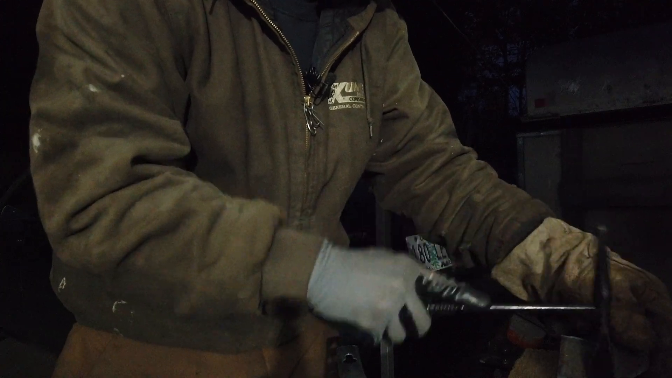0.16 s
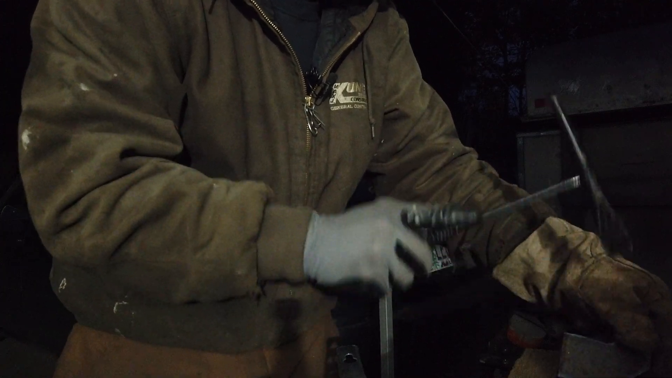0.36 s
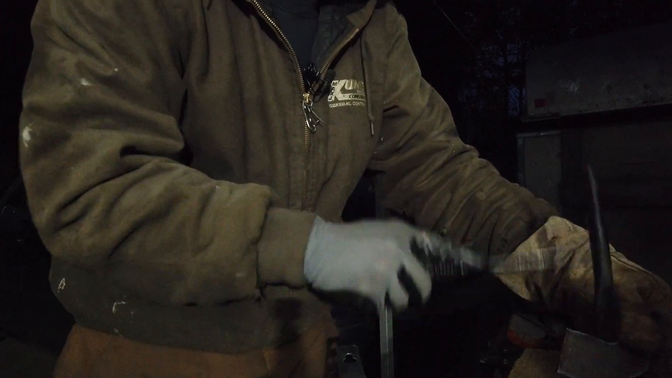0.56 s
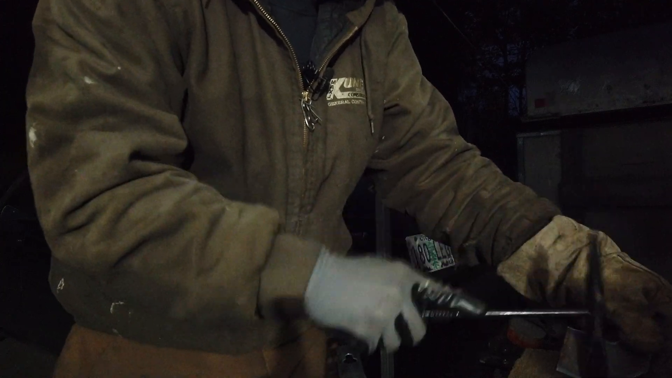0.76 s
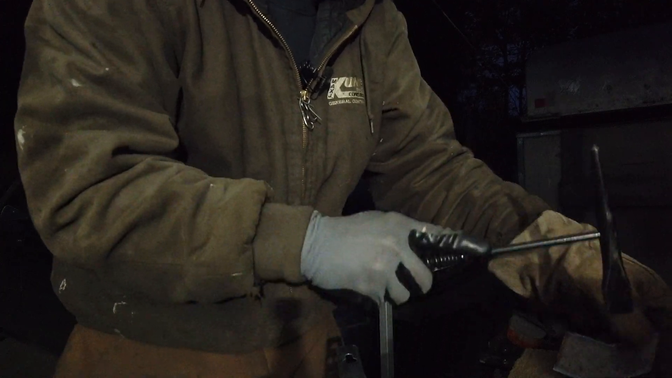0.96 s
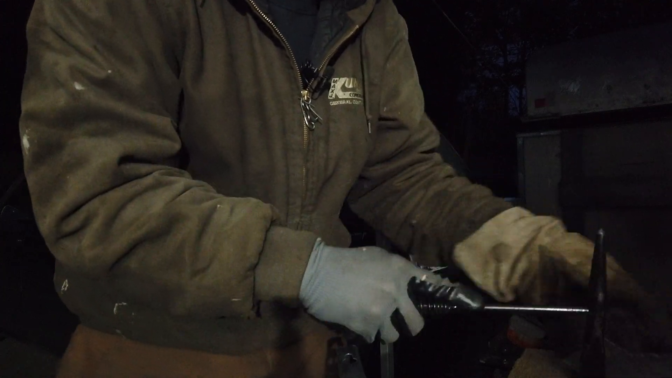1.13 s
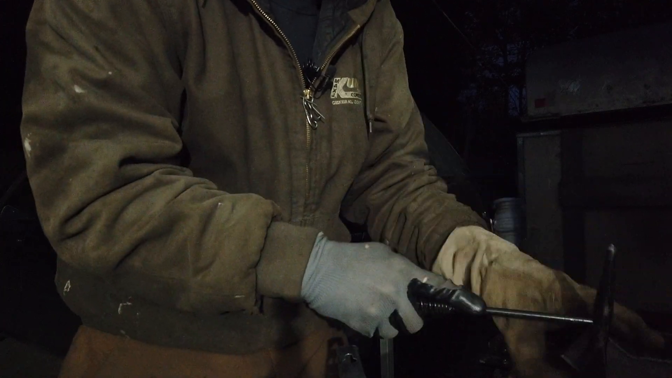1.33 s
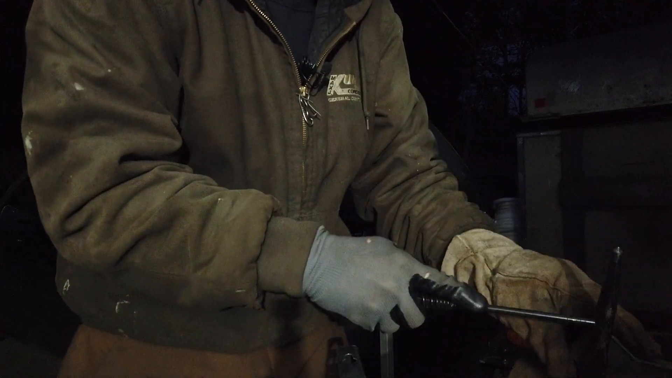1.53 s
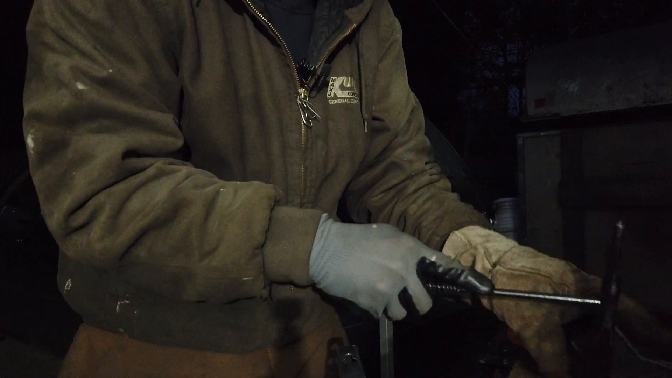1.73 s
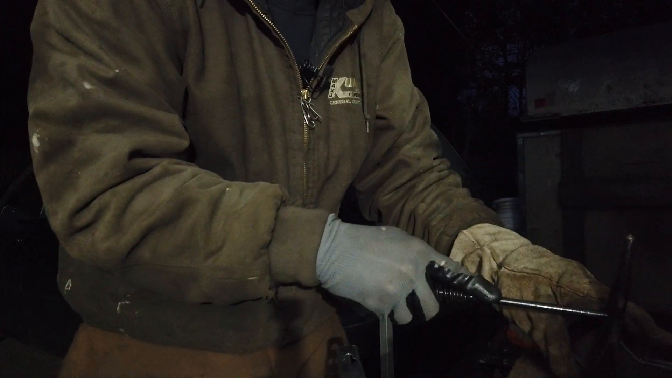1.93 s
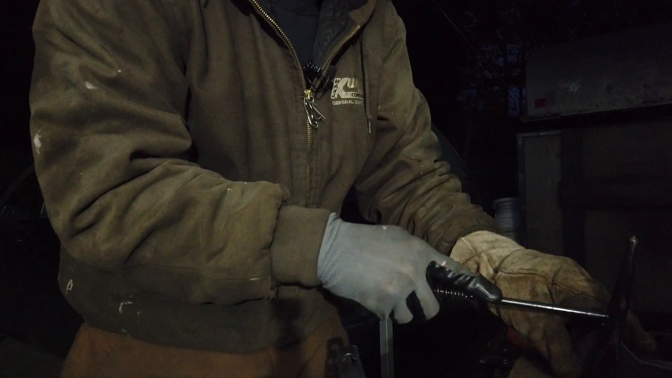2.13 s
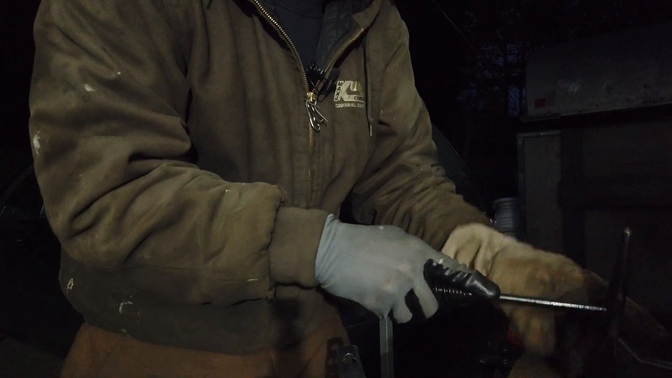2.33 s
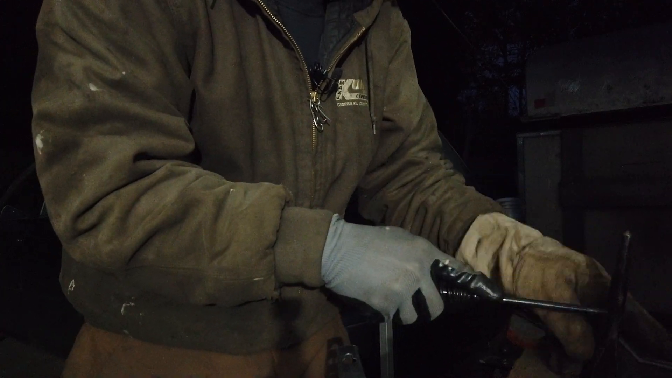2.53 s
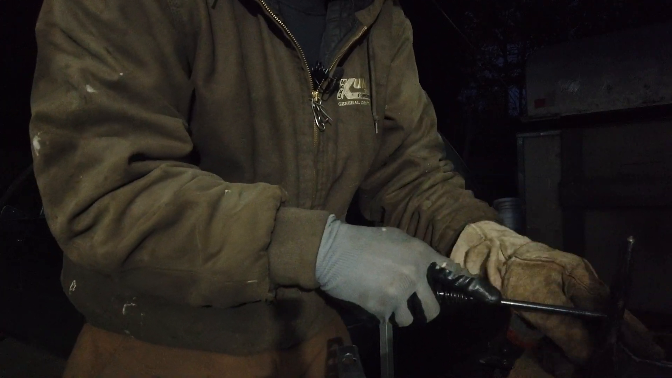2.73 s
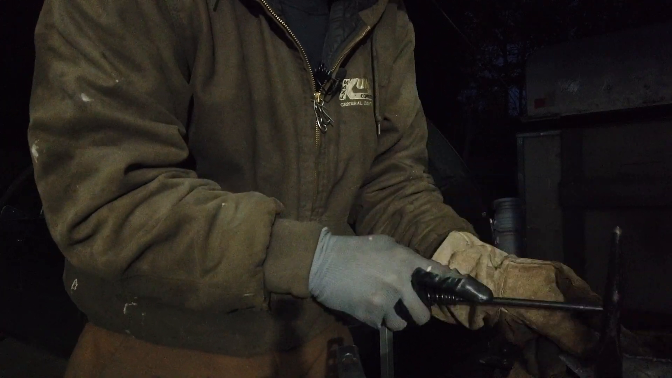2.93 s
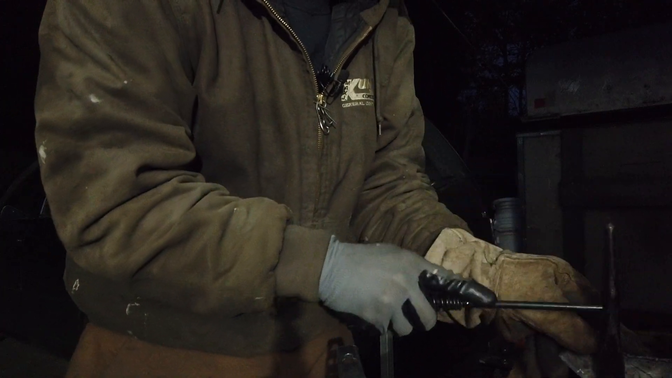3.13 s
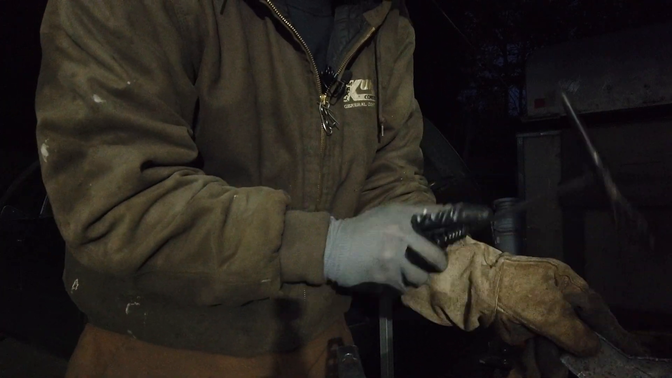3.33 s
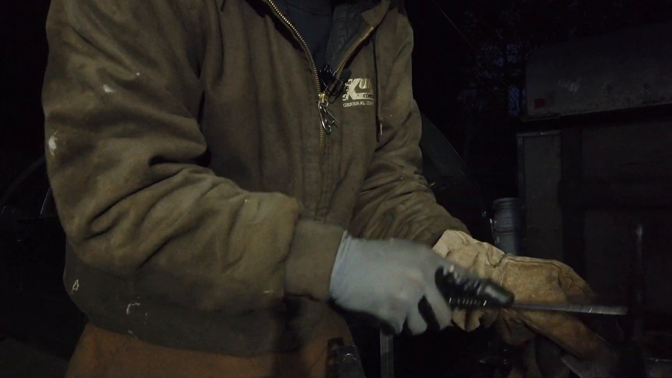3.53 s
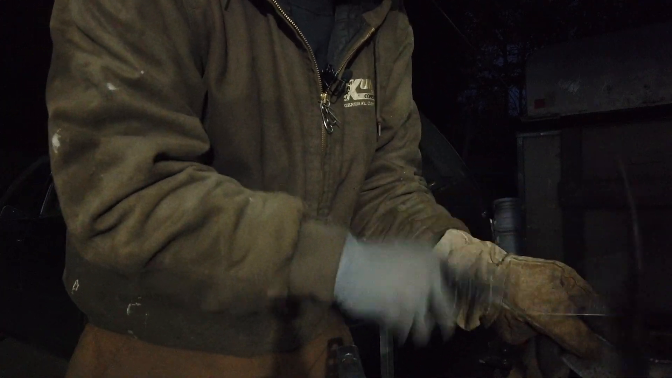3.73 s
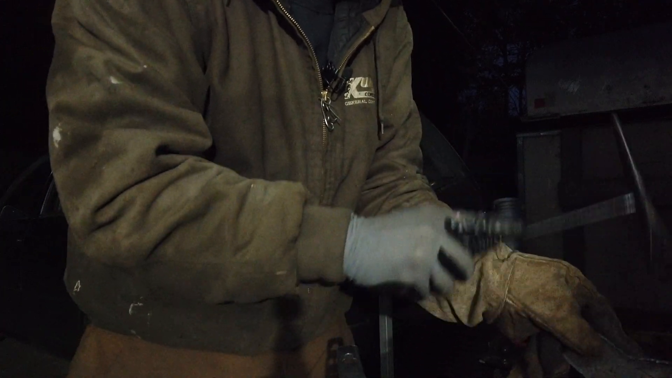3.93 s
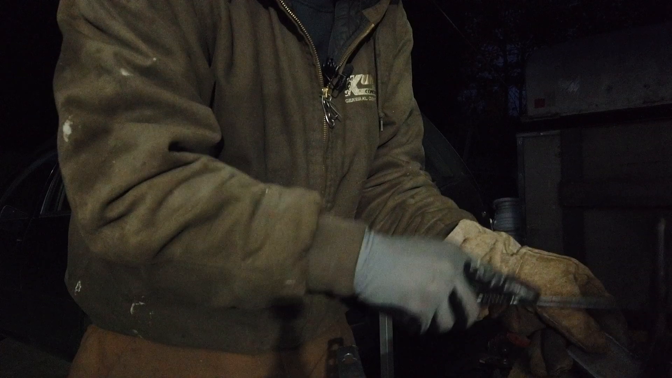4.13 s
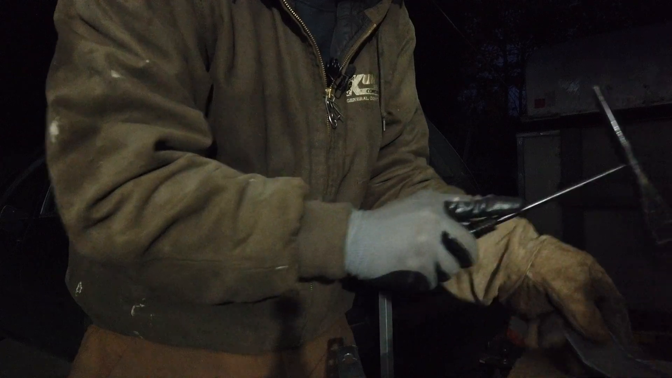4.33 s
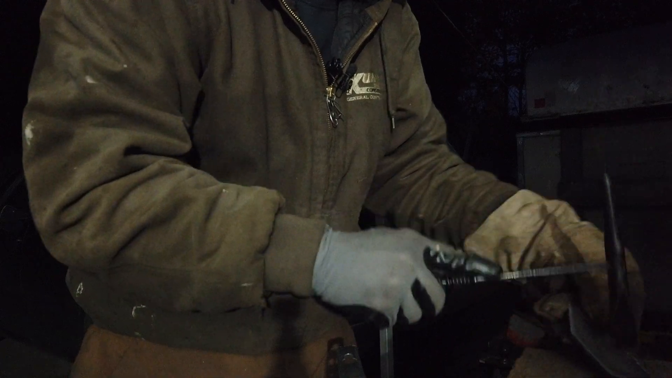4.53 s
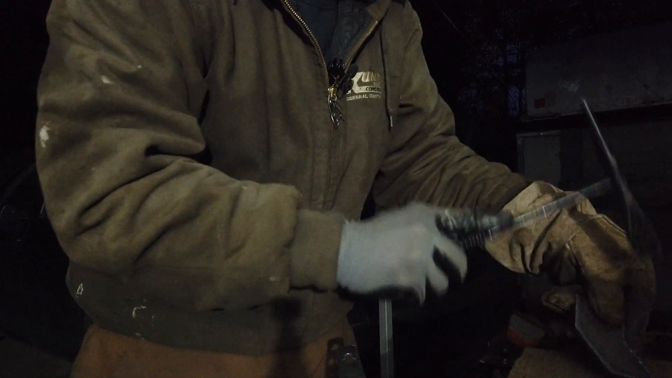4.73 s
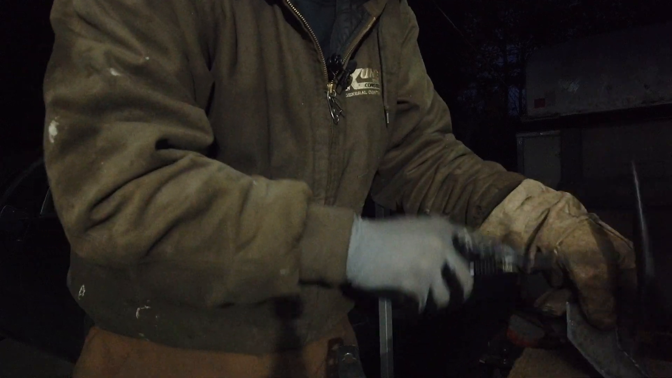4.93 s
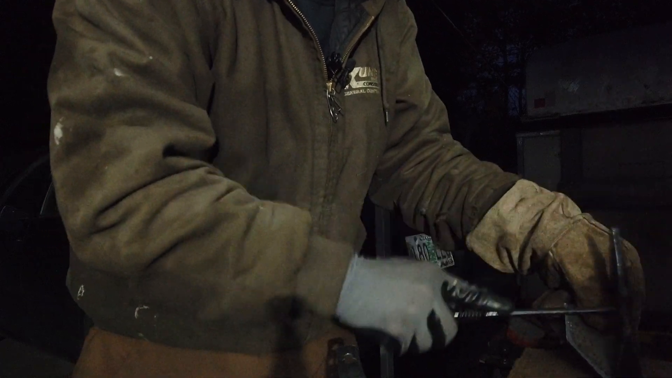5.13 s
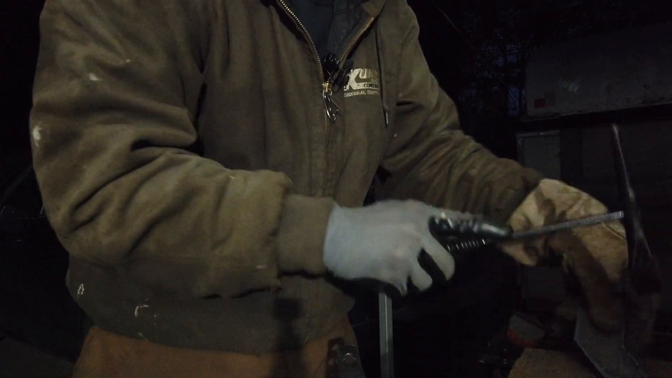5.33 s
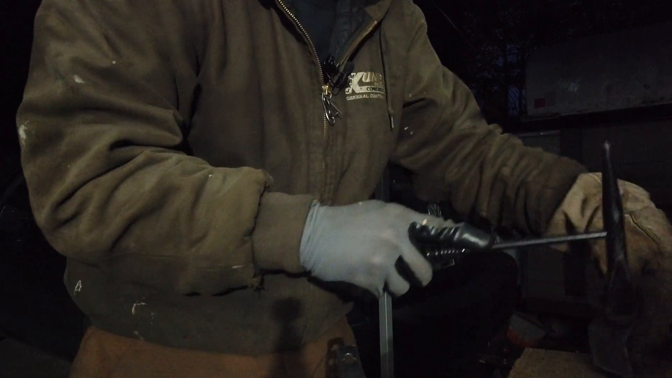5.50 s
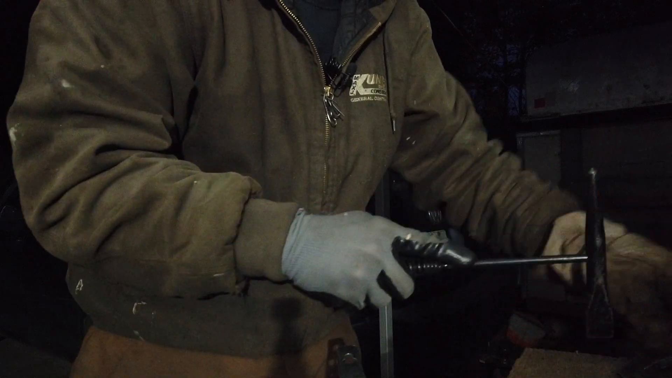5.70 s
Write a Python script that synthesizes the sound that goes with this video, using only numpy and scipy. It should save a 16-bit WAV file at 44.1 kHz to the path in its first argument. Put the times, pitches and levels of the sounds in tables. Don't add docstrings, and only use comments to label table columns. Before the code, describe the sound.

Close sound of a pointed steel hammer chipping a loose cut plate in a small workshop. Hard, gritty clanks with a short plate thump fall at 0.28, 0.58 and 0.88 seconds, then a lighter, thinner chip at 1.26 rings a little longer. From about 1.3 to 3.2 the work quiets: glove scuffs, sleeve rustle, dull ticks, and a clear little bouncing ping near 2.0, with smaller taps after. Gas hiss, low rumble and a faint far engine hum become more noticeable. A light chip at 3.23 leads to a bright ringing crack at 3.59, the hardest clank at 3.90 and a heavy, rattling blow at 4.20. The plate is shifted with rustling and scuffing around 4.4, then duller strong blows land at 4.95 and 5.25. Small scuffs and ticks close from 5.7. Echo is short; the loudest hits overload the microphone; treble noise spreads slightly in stereo.

```python
import sys
import numpy as np
from scipy import signal
from scipy.fft import rfft, irfft, next_fast_len
from scipy.io import wavfile
from scipy.ndimage import uniform_filter1d, minimum_filter1d, map_coordinates

SR = 44100
rng = np.random.default_rng(int(sys.argv[2]) if len(sys.argv) > 2 else 0)


def wrap_up_sound(samples):
    columns = np.atleast_2d(samples).T
    tamed = np.clip(columns, -1, 1)
    steps = np.round(tamed * 32767).astype(np.int16)
    wavfile.write(sys.argv[1], SR, steps)


def invert_db(level):
    return 10 ** (np.asarray(level, dtype=float) / 20)


N = 258426
T = np.arange(SR // 4) / SR

# (first touch t/s, crack level/dB, brightness/dB, push on the plate level/dB,
# wait until the plate slaps the bench t/s)
BLOWS = [
    (0.2767, -8, -11, -29, 0.002),
    (.5816, -4, -16.5, -27, 0.0025),
    (0.8795, -9, -12, -20.5, 0.0011),
    (1.2596, -17.5, -12.5, -56, 0.0037),
    (3.2286, -14.5, -18, -55, 0.00066),
    (3.5921, -3.5, -4, -25.5, 0.0066),
    (3.902, -1, -10.5, -20, .002),
    (4.1974, -2, -19, -16.5, 0.0019),
    (4.9478, -2, -21.5, -21, 0.0042),
    (5.2469, -4.5, -17, -16.5, 0.0018),
]
# (t/s, hiss level/dB)
QUIET = [(0, -61.5), (1.2, -62), (1.94, -60.5), (3.1, -57.5), (3.4, -54.5), (3.58, -57), (3.65, -55.5),
         (3.89, -64.5), (3.96, -64), (4.5, -63.5), (5.2, -64.5), (5.7, -63.5), (5.86, -61.5)]


def unit(x):
    return x / np.sqrt(np.mean(x ** 2) + 1e-20)


def along(points, hz):
    f, v = np.transpose(points)
    return np.interp(np.log(hz + 1), np.log(f + 1), v)


def curve(rows, outside=None):
    s, values = np.transpose(rows)
    return np.interp(np.arange(N) / SR, s, values, outside, outside)


def wobble(rate):
    s = np.arange(0, N + 64, 64)
    knots = rng.standard_normal(int(N * rate / SR) + 4)
    return np.interp(np.arange(N), s, map_coordinates(knots, [s * rate / SR]))


def held_db(start, stop, db, slope_db_per_s):
    s = np.arange(N) / SR
    outside_s = np.maximum(np.maximum(start - s, s - stop), 0)
    return db - slope_db_per_s * outside_s


def tone(hz):
    return np.sin(2 * np.pi * np.cumsum(hz) / SR)


def fade(t, t60, attack):
    return invert_db(-60 * t / t60) * (1 - np.exp(-t / attack))


def filtered(x, response):
    m = next_fast_len(len(x) + 8192)
    return irfft(rfft(x, m) * response(np.fft.rfftfreq(m, 1 / SR)), m)[:len(x)]


def resonances(modes, widen=1):
    def response(f):
        total = 0
        for k, (c, w, db) in enumerate(modes):
            damping = 1j * f * w * widen
            total = total + (-1) ** k * invert_db(db) * damping / (c * c - f * f + damping)
        return total
    return response


def coloured(spectrum):
    return unit(filtered(rng.standard_normal(N), lambda hz: invert_db(along(spectrum, hz))))


def add(track, s, sound):
    part = track[round(s * SR):][:len(sound)]
    part += sound[:len(part)]


def rung(response, rattle, rise, blow=0):
    force = rng.standard_normal(len(T)) * fade(T, rattle, rise)
    force[0] = blow
    x = filtered(force, response)
    return x / np.abs(x).max()


def bending(db, t60, flight, landed_db, landing=0.00063):
    bend_hz = 3377
    damping_db = landed_db / (1 + np.exp(-(T - flight) / landing))
    return invert_db(db + damping_db) * fade(T, t60, 0.0001) * np.sin(2 * np.pi * bend_hz * T)


def outside():
    # (f/Hz, level/dB)
    rumble = [(15, -24), (28, -9), (70, 7), (120, 0.5), (200, -2), (300, -2.5), (450, -16.5), (900, -120)]
    drone = [(200, -56.5), (300, -11.5), (420, -1), (600, -4.5), (900, -1.5), (1150, -5.5), (1500, -17.5),
             (3000, -120)]
    quiet_db = curve(QUIET)
    out = invert_db(quiet_db + 2.5 + 0.97 * wobble(13)) * coloured(rumble)
    return out + invert_db(quiet_db - 5 + 1.2 * wobble(7.1)) * coloured(drone)


def engine():
    # (t/s, level/dB)
    firing = [(2.2, -79), (2.5, -57), (2.75, -79), (3.1, -67), (3.28, -52), (4, -58.5), (4.2, -74.5),
              (4.55, -63), (5.2, -57.5), (5.4, -77)]
    firing_hz = 101 + 1.4 * wobble(1.4)
    bark_db = held_db(2.43, 3.55, -64, slope_db_per_s=52)
    notes = invert_db(curve(firing, -120)) * tone(firing_hz) + invert_db(bark_db) * tone(2 * firing_hz)
    return np.sqrt(2) * invert_db(2.4 * wobble(9.2)) * notes


def gas():
    # (f/Hz, level/dB)
    hiss = [(3800, -25.5), (4400, -10), (5020, -4.5), (5940, -5), (6390, -2.5), (7230, -0.5), (7770, -2),
            (9190, -7), (10900, -5.5), (11900, -6.5), (14300, -8.5), (15100, -4.5), (15700, -11.5),
            (15800, -120)]
    # (f/Hz, width/Hz, level/dB)
    whistles = [(4900, 40, 5), (5340, 40, 4), (6200, 40, 2), (7430, 35, 5), (8110, 40, 3), (9600, 40, 1),
                (11640, 40, 4), (12190, 40, 5), (12320, 40, 5), (13540, 40, 1), (15240, 60, 3),
                (15550, 60, 3)]
    jet = lambda hz: invert_db(along(hiss, hz)) * (1 + np.abs(resonances(whistles)(hz)))
    steady = unit(filtered(rng.standard_normal(N), jet))
    hz, t, z = signal.stft(steady, nperseg=512)
    patches = uniform_filter1d(rng.standard_normal(z.shape), size=4, axis=0)
    patches = unit(uniform_filter1d(patches, size=24, axis=1))
    patchy = unit(signal.istft(z * invert_db(2.2 * patches), nperseg=512)[1][:N])
    out = invert_db(curve(QUIET) + 1.1) * patchy
    whistle_db = held_db(1.8, 3, -69, slope_db_per_s=32.5) + 2.5 * wobble(18)
    return out + np.sqrt(2) * invert_db(whistle_db) * tone(7280 + 12 * wobble(40))


def sleeve():
    # (f/Hz, level/dB)
    murk = [(800, -64.5), (1100, -16), (1400, 7), (2200, 0), (3500, 4.5), (4300, 2.5), (5000, -18),
            (8000, -120)]
    # (from t/s, to t/s, level/dB)
    rustles = [
        (1.05, 3.2, 1.5),
        (4.279, 4.56, 4),
    ]
    rustle_db = sum(np.maximum(held_db(*rustle, slope_db_per_s=39.5), 0) for rustle in rustles)
    return invert_db(curve(QUIET) - 11.5 + rustle_db + 1.5 * wobble(7.2)) * coloured(murk)


def dragged_tip():
    sing_db = held_db(2.3, 2.72, -77, slope_db_per_s=80)
    return invert_db(sing_db + 4.6 * wobble(30)) * tone(2100 + 70 * wobble(90))


def shop(x):
    # (f/Hz, time to fall 60 dB t/s)
    decay = [(100, 0.44), (500, 0.22), (1500, 0.2), (4000, 0.19), (12000, 0.23)]
    out, step = np.zeros(N), round(.3 * SR)
    hz, t, z = signal.stft(rng.standard_normal((N // step + 1, SR // 4)), SR, nperseg=256)
    tails = signal.istft(z * invert_db(-60 * t / along(decay, hz)[:, None]), SR, nperseg=256)[1]
    for k, tail in enumerate(tails):
        echo = signal.fftconvolve(x[k * step:][:step], tail / np.linalg.norm(tail))
        add(out, k * step / SR + .006, echo)
    return out


def scuffs():
    # (middle t/s, half length t/s, level/dB, centre f/Hz)
    rubs = [(1.135, 0.036, -59.5, 1110), (1.294, 0.02, -57.5, 362), (1.567, 0.017, -56, 1140),
            (1.737, 0.019, -57, 2200), (1.918, 0.013, -63, 1430), (2.31, 0.016, -55.5, 2200),
            (2.526, 0.03, -57.5, 1410), (2.892, 0.019, -60, 1230), (2.98, 0.042, -61, 1560),
            (3.31, 0.018, -54, 1300), (4.418, 0.16, -65, 1693), (4.752, 0.013, -58, 980),
            (5.719, 0.017, -49, 723), (5.791, .05, -57.5, 1730)]
    spread_octaves, spread_in_time = .52, .55
    out, t = np.zeros(N), T[:200]
    for s, half, db, hz in rubs:
        when, pitch, size = rng.standard_normal((3, 300))
        grain_hz = hz * 2 ** (spread_octaves * pitch[:, None])
        grains = np.sin(2 * np.pi * grain_hz * t) * np.exp(-t * grain_hz / 2.2)
        grains = invert_db(3 * size[:, None]) * grains
        starts = np.round((s + spread_in_time * half * when) * SR).astype(int)
        at = starts[:, None] + np.arange(len(t))
        clump = np.bincount(at.ravel(), grains.ravel(), N)[:N]
        out += invert_db(db) * clump / np.sqrt(np.sum(clump ** 2) / (2 * half * SR))
    return out


def taps():
    # (t/s, click level/dB, click centre f/Hz, bending level/dB, free flight t/s)
    ringing = [
        (1.807, -47.5, 2500, -50.5, 0.15),
        (2.012, -30, 2960, -29, 0.074),
        (2.053, -49, 1680, -49, 0.045),
        (2.219, -48, 3000, -26, 0.0068),
        (2.301, -37.5, 2200, -37, 0.016),
        (2.486, -41, 1800, -44, 0.018),
        (3.252, -26, 2200, -37, 0.03),
    ]
    # (t/s, level/dB, centre f/Hz)
    ticks = [(1.47, -48.5, 1500), (2.689, -52, 1537), (2.877, -41.5, 1360), (2.952, -45.5, 2500),
             (3.035, -47, 1290), (3.182, -32, 1250), (4.743, -44, 1310), (4.963, -22, 9010),
             (5.261, -27, 12000), (5.704, -38.5, 557), (5.792, -38, 1330), (5.808, -45, 1600),
             (5.825, -39.5, 1500)]
    t60_per_flight = 3.1
    out = np.zeros(N)
    for s, click_db, hz, *_ in ringing + ticks:
        contact = lambda f: resonances([(hz, min(.9 * hz, 2500), 0)])(f) ** 3
        add(out, s, invert_db(click_db) * rung(contact, 0.011, 0.00028))
    for s, _, _, bend_db, flight in ringing:
        add(out, s, bending(bend_db, t60_per_flight * flight, flight, landed_db=-16, landing=0.0088))
    return out


def slag():
    # (f/Hz, level/dB)
    crack = [(300, -21.5), (1000, -3.5), (2000, -4), (3000, -2.5), (4500, -7.5), (6000, -12), (8200, -6),
             (10000, -17), (12500, -20), (15600, -24.5), (16500, -47)]
    out = np.zeros(N)
    for s, crack_db, bright_db, _, _ in BLOWS:
        def colour(hz):
            treble = np.clip(np.log2(hz / 3000 + 1e-3), 0, 1)
            return invert_db(along(crack, hz) + (bright_db + 12) * treble)
        chip_db = 5 * np.repeat(rng.standard_normal(len(T) // 20 + 1), 20)[:len(T)]
        grit = unit(filtered(rng.standard_normal(len(T)) * invert_db(chip_db), colour))
        add(out, s, invert_db(crack_db) * grit * fade(T, 0.01, 0.00013))
        dust = filtered(grit, lambda hz: invert_db(-6 * np.log2(1 + hz / 4000)))
        add(out, s, invert_db(crack_db - 20.5) * dust * fade(T, .16, 0.0031))
    return out


def plate():
    # (f/Hz, width/Hz, level/dB)
    bench_modes = [(105, 40, -13), (155, 40, -9), (200, 40, -9), (255, 40, -7), (312, 32, -4), (367, 26, 0),
                   (470, 60, -10), (548, 45, -3)]
    low_modes = [(665, 30, -11), (765, 26, -1), (838, 30, 1), (972, 30, -6)]
    high_modes = [(1133, 37, 3), (1335, 110, -3), (1526, 81, -3), (1570, 3.8, -11.5), (1695, 39, -0.5),
                  (1720, 27, -6.5), (1810, 190, -4), (2200, 41, -16.5), (2477, 77, -23)]
    glove_damping = 0.98
    bench, low, high = [resonances(m, glove_damping) for m in (bench_modes, low_modes, high_modes)]
    out = np.zeros(N)
    for s, crack_db, _, push_db, delay in BLOWS:
        high_db = 1 + 0.71 * push_db + 0.29 * crack_db
        add(out, s, invert_db(high_db) * rung(high, 0.091, .001, blow=5.3))
        flat_db = 4 * (s < 1.1)
        bench_db = -5 + 0.59 * push_db + flat_db
        add(out, s + delay, invert_db(bench_db) * rung(bench, 0.079, 0.0015, blow=14))
        add(out, s + delay, invert_db(push_db + 3.5) * rung(low, 0.074, 0.0049, blow=5.8))
    return out


def head():
    # (bending level/dB, its 60 dB decay t/s, free flight before the tip lands t/s,
    # twisting level/dB, overtone level/dB)
    rings = [(-37, .046, .01, -30.5, -47), (-31.5, 0.055, .01, -49.5, -28.5),
             (-23.5, 0.024, .02, -32.5, -25), (-21.5, .23, .077, -30, -33), (-5, 0.02, 0.0088, -34, -28.5),
             (-7, .3, .027, -31, -20.5), (-2, 0.051, 0.01, -26, -13), (-17, .17, .0245, -22.5, -27),
             (-14.5, 0.067, 0.0068, -17, -19), (-15.5, 0.039, 0.0054, -28.5, -38)]
    # (f/Hz, width/Hz, level/dB)
    overtones = [
        [(5405, 45, 0), (5215, 90, -14)],
        [(6935, 30, 0), (7075, 40, -6), (6875, 30, -4)],
        [(8032, 35, 0), (8250, 150, -10)],
        [(8890, 55, 0)],
        [(10560, 70, -8), (11630, 50, 0), (12200, 90, -9), (13200, 65, -7), (15340, 90, -15)],
    ]
    # (f/Hz, width/Hz, level/dB)
    chatter = [(3290, 51, 2.5), (3397, 40, 1), (3463, 57, -7)]
    grip_widens = 1.5
    out = np.zeros(N)
    for (s, *_), (bend_db, t60, flight, twist_db, over_db) in zip(BLOWS, rings):
        landed_db = min(.9 * (-40 - bend_db + 60 * flight / t60), -11)
        add(out, s + .0003, bending(bend_db, t60, flight, landed_db))
        add(out, s, invert_db(bend_db - 18) * rung(resonances(chatter), 0.04, 0.0016))
        woken = twist_db, over_db, over_db - 2.5, over_db - 9.5, over_db + 1.5
        for modes, db in zip(overtones, woken):
            ring = rung(resonances(modes, grip_widens), .04, 0.00035, blow=14)
            add(out, s, invert_db(db + 2.5) * ring)
    return out


def scene():
    background = outside() + engine() + gas() + sleeve() + dragged_tip()
    work = scuffs() + taps() + slag() + plate() + head()
    mid = work + invert_db(-12.5) * shop(work) + background
    return np.array([mid, mid])


def microphone(x):
    top = np.where(x > 0, .5, .43)
    x = x / (1 + np.abs(x / top) ** 5) ** (1 / 5)
    x = filtered(x + .12 * x ** 2, resonances([(600, 84000, 0.015)]))
    return signal.sosfilt(signal.butter(18, 16100, fs=SR, output="sos"), x)


def side_noise(x):
    bands = [3100, 3600, 4200, 4900, 5600, 6300, 7000, 7700, 8400, 9100, 10400, 11800, 13200, 14500, 15100,
             15800]
    hz, t, z = signal.stft(x, SR, nperseg=1024)
    band = np.searchsorted(bands, hz)
    runs = uniform_filter1d(rng.standard_normal((len(bands) + 1, len(t))), size=9, axis=1)
    inside = (hz > bands[0]) & (hz < bands[-1])
    share = 1.1 * np.clip(hz / 9000, 0, 1)
    filled = (unit(runs)[band] > -share[:, None]) * inside[:, None]
    power = np.sum(np.abs(z) ** 2, axis=0)
    attack = power > 20 * np.roll(power, 2)
    calm = minimum_filter1d(1. - attack, size=5, origin=1)
    level = np.exp(uniform_filter1d(np.log(np.abs(z) + 1e-9), size=16, axis=0))
    noise = signal.stft(rng.standard_normal(N), SR, nperseg=1024)[2]
    noise = noise / np.sqrt(np.mean(np.abs(noise) ** 2))
    return signal.istft(invert_db(-3) * filled * calm * level * noise, SR, nperseg=1024)[1][:N]


def top_cut(x):
    return signal.sosfilt(signal.butter(12, 16960, fs=SR, output="sos"), x)


def record(dry):
    x = microphone(dry[0])
    side = side_noise(x)
    return top_cut(np.array([x + side, x - side]))


dry = scene()
out = record(dry)
wrap_up_sound(out)
```